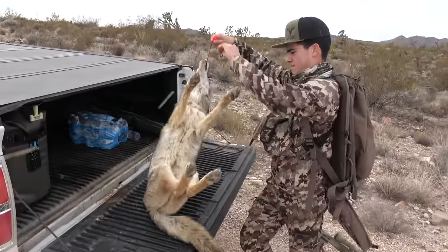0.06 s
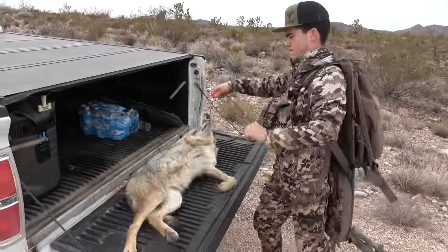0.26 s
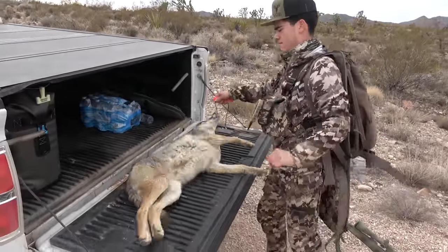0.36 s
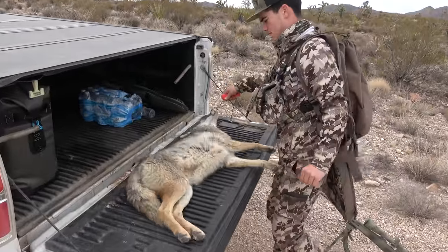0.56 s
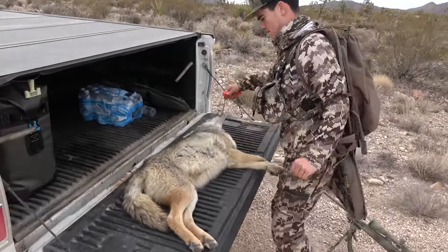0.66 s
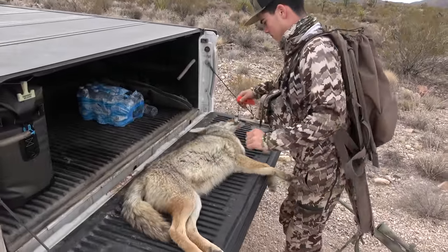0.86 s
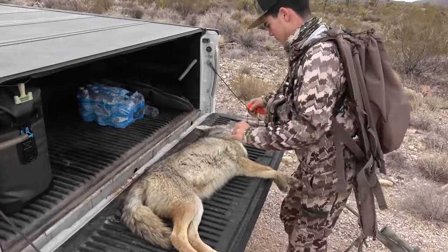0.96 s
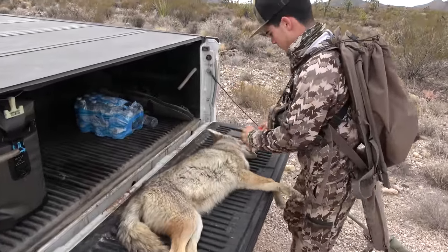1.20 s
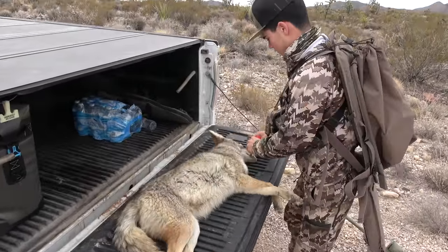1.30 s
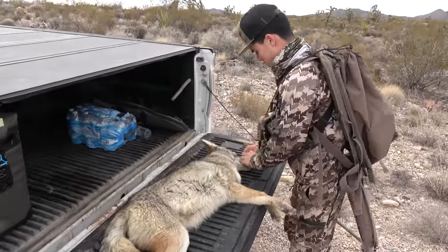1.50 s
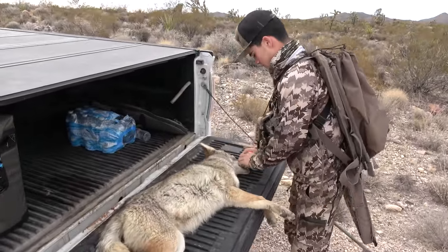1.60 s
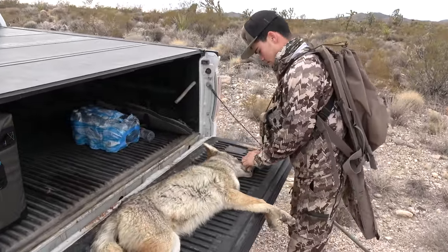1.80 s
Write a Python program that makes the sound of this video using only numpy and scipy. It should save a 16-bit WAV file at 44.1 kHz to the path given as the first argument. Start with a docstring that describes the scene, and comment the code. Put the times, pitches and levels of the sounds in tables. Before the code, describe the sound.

A heavy carcass thumps onto a truck tailgate, followed by knocks, small clicks and scuffs.

```python
"""A heavy carcass drops on the ribbed plastic tailgate of a truck in open scrubland.
Its soft weight slumps and forces the panel to boom and drum while the truck body rumbles; legs and head
knock on the panel with sharp attacks and leave it ringing. Strap, buckle and claws click as the strap is
worked loose, and cloth and fur scuff by friction. A faint open-air hiss and light wind lie below."""
import sys
import numpy as np
from scipy import signal
from scipy.fft import rfft, irfft, next_fast_len
from scipy.io import wavfile
from scipy.ndimage import uniform_filter1d, minimum_filter1d

SR = 44100
rng = np.random.default_rng(int(sys.argv[2]) if len(sys.argv) > 2 else 0)


def unload_wav(signal):
    """Save mono or channel-first audio to the path in sys.argv[1] as 16-bit WAV at rate SR, clipped to [-1, 1]."""
    wavfile.write(
        sys.argv[1],
        SR,
        np.round(np.clip(np.atleast_2d(signal).T, -1, 1) * 32767).astype(np.int16),
    )


N = 81585

# Weight rolling onto the panel: (time [s], boom [dB], drumming [dB], truck rumble [dB])
SLUMP_LEVELS = [(0.222, -75, -85, -53), (0.24, -21.5, -20, -28.5), (0.264, -37, -10, -17.5),
                (0.286, -8.5, -22, -35), (0.31, -19.5, -20, -26), (0.332, -9.5, -13.5, -33),
                (0.37, -12.5, -18.5, -34), (0.42, -19, -19.5, -33.5), (0.474, -27, -38.5, -34),
                (0.62, -44, -49.5, -43), (0.666, -43.5, -43, -60), (0.704, -42.5, -67, -51),
                (0.732, -49, -58, -56), (0.754, -54, -51, -61), (0.86, -64, -52.5, -61)]
# Spectra of the boom, drumming and knocks: (frequency [Hz], relative density [dB])
BOOM_SPECTRUM = [(65, -43), (110, -17), (189, -4), (221, -22), (252, -1.5), (324, -3.5), (384, -15),
                 (442, -53), (600, -2.5), (780, -31), (1320, -120)]
DRUM_SPECTRUM = [(210, -6), (350, -37), (404, -19.5), (824, -8), (906, -31), (1040, -11), (6000, -43.5),
                 (7800, -60), (13200, -120)]
PANEL_SPECTRUM = [(59, -52), (100, -25.5), (620, -5), (867, -7.5), (1460, -2.5), (2800, -8.5), (3760, -11),
                  (4940, -34), (6760, -38.5), (15000, -84)]
# Hard impacts, in relative levels: (time [s], crack [dB], bass [dB], middle [dB], treble [dB], top [dB],
# favoured frequency [Hz], decay time factor [1])
IMPACTS = [(0.241, -7, -15, -15.5, -18.5, -23, 774, 3.3), (0.261, -9, -14, -10, -23, -27, 573, 1.1),
           (0.311, -9.5, -29, -12, -23, -21, 770, 0.54), (0.329, -5, -16, -22.5, -22, -26.5, 255, 3.3),
           (0.376, -13, -10.5, -32, -18.5, -18, 576, 0.6), (0.413, -6, -11.5, -16, -38, -46, 347, 0.81),
           (0.491, -36, -43, -53, -33, -39.5, 318, 1.4), (0.556, -47, -32.5, -40, -30, -39.5, 270, 1.14),
           (0.602, -28, -46, -45, -40.5, -39, 355, 1.2), (0.878, -22.5, -42.5, -39, -54, -43, 288, 0.59),
           (0.888, -21.5, -45.5, -31.5, -41, -43.5, 786, 1.4),
           (1.047, 3.5, -17.5, -11.5, -17, -41, 704, 1.34), (1.072, 2.5, -19, -13, -19, -30.5, 590, 1.1),
           (1.143, -9, -22.5, -18.5, -11.5, -25, 590, 1.16), (1.252, -33, -30.5, -37, -32.5, -62, 750, 1.9),
           (1.26, -13, -24, -19, -21, -45, 590, 1), (1.287, -14, -41.5, -34.5, -70, -52, 350, 2.8),
           (1.473, -16.5, -38.5, -29.5, -31.5, -44, 1030, 1.4), (1.5, -27, -38, -44, -40.5, -41, 313, 3.3),
           (1.54, -5, -18.5, -13, -26, -42, 426, 0.88), (1.626, -35.5, -37.5, -49.5, -25.5, -45, 266, 0.38)]
# Damping of the panel: (frequency [Hz], time to fall 60 dB [s])
PANEL_DECAY = [(120, 0.39), (300, 0.22), (700, 0.21), (1800, 0.11), (4500, 0.12), (7000, .11),
               (12000, 0.031)]
# Normal modes of the panel: (frequency [Hz], relative level [dB], time to fall 60 dB [s])
PANEL_MODES = [(188.4, -1, 0.18), (257, -6, .18), (303, -2, 0.19), (437, -9, 0.16), (576.6, -1.5, 0.13),
               (654.5, -5, 0.15), (770.4, -4, 0.11), (1015, -7, .12), (1371, -9, .1), (1524, -9, 0.12),
               (1760, -8, 0.082), (2170, -19, .08)]
# Small clicks of strap, buckle and claws, and the sharp attacks of knocks on the panel:
# (time [s], tock level [dB], pitch [Hz], snap level [dB])
CLICKS_AND_ATTACKS = [(.023, -15, 860, -22), (0.054, -16, 890, -18.5), (.070, -18, 1250, -20),
                      (.078, -17, 880, -40), (.093, -17, 1110, -33), (.101, -20, 1000, -32),
                      (0.126, -17, 1000, -25), (.150, -21.5, 1450, -31), (0.3103, -29, 1400, -3),
                      (.3765, -21, 3700, -13), (.379, -12, 6200, -3), (.381, -22, 3700, -16),
                      (.492, -34, 4200, -29), (.521, -40, 4500, -36), (0.556, -17.5, 1040, -21),
                      (.722, -30, 3300, -46), (.796, -28.5, 1480, -58), (.836, -29.5, 2510, -38),
                      (0.916, -37, 1480, -24), (.929, -7.5, 880, -13), (0.967, -13, 1230, -14),
                      (0.987, -18, 1500, -34), (.995, -19, 1100, -14), (1.02, -36, 1370, -24),
                      (1.035, -14, 1420, -24), (1.0465, -6, 1450, -34), (1.0728, -6, 3600, -27),
                      (1.289, -35, 900, -31), (1.399, -33, 1440, -45), (1.477, -10.5, 1920, -22),
                      (1.503, -15, 3200, -25), (1.5387, -9.5, 990, -32), (1.565, -15, 3500, -21),
                      (1.599, -18, 1600, -39), (1.607, -11.5, 1320, -32), (1.628, -31, 4200, -36),
                      (1.665, -13, 980, -32), (1.709, -8.5, 1450, -28), (1.715, -11, 1550, -40),
                      (1.742, -22, 1190, -43), (1.760, -19.5, 990, -32.5), (1.792, -11.5, 1050, -20.5),
                      (1.805, -15.5, 1110, -41), (1.836, -28, 1010, -49)]
# Rubbing of cloth and fur: (time [s], level [dB])
SCUFF_LEVELS = [(0, -34.5), (.05, -32.5), (.11, -33), (.145, -35.5), (.165, -49), (.22, -47), (.6, -50.5),
                (.75, -45), (.86, -54.5), (.93, -49.5), (.98, -33), (1.03, -45), (1.2, -51), (1.44, -56.5),
                (1.49, -43), (1.53, -49), (1.62, -38), (1.69, -46.5), (1.73, -37), (1.78, -41.5),
                (1.82, -41), (1.85, -40)]
# Spectra of the rubbing and the open air: (frequency [Hz], relative density [dB])
SCUFF_SPECTRUM = [(120, -8.5), (350, 1.5), (550, -5), (1000, -1), (2000, -6), (3300, -8.5), (4300, -11.5),
                  (5200, -18), (8000, -20.5), (12000, -26), (15000, -46)]
AIR_SPECTRUM = [(25, 10), (60, 6.5), (250, 11), (650, -4), (1500, -11), (4000, -10.5), (5200, -15.5),
                (8000, -13.5), (14000, -20.5), (16000, -40)]
# Stereo balance: (frequency [Hz], left minus right [dB])
BALANCE = [(60, 2), (180, 3.5), (550, -4), (1650, -1), (4970, 0), (15000, 1)]
# Stereo width: (frequency [Hz], side relative to middle [dB])
SIDE_LEVELS = [(60, -20), (180, -30), (550, -28), (1650, -37), (5000, -23.5), (15000, -11)]

BAND_EDGES_HZ = 28 * 2 ** np.arange(0, 9.4, 1 / 3)
KNOCK_HZ = (350, 1300, 3500, 8000)   # bass, middle, treble, top
KNOCK_GAIN_DB, CRACK_GAIN_DB, CRACK_T60_S = -4, -9, 0.0063
MODE_GAIN_DB, MODE_LOSS_DB_PER_OCTAVE, MODE_JITTER_S = 4.5, 11, 0.002025
TOCK_T60_CYCLES, SNAP_HZ = 4.87, (2050, 8330)
GRAINS_PER_S, GRAIN_SPREAD_DB = 3000, 3.5
HISS_DB, WIND_DB, AIR_WIDTH = -51, -67.5, 0.14
LIMIT_DB, RELEASE_DB_PER_S = -2.5, 150


def slump():
    """Forced vibration: the soft weight drives a boom and hollow drumming over the truck's rumble."""
    silence = (SLUMP_LEVELS[-1][0] + .05, -90, -90, -90)
    boom_db, drum_db, rumble_db = in_time(SLUMP_LEVELS + [silence])
    boom = coloured(rng.standard_normal((2, N)), BOOM_SPECTRUM + [(1100, -51)])
    drum = coloured(rng.standard_normal((2, N)), [(200, -50)] + DRUM_SPECTRUM + [(9000, -74)])
    rumble = unit_rms(band(rng.standard_normal(N), 43, 124))
    return amp(boom_db) * boom + amp(drum_db) * drum + amp(rumble_db) * rumble


def knocks():
    """Free vibration: each impact cracks and excites the panel's modes; the treble is damped sooner."""
    times, crack, bass, middle, treble, top, favoured_hz, decay_factor = np.transpose(IMPACTS)
    white, panel = rng.standard_normal((2, N)), 0
    bandwidth_db = 10 * np.log10(np.array(KNOCK_HZ) * 3 / SR)
    tilts = np.transpose([bass, middle, treble, top]) - at_hz(PANEL_SPECTRUM, KNOCK_HZ) - bandwidth_db
    # Densely overlapping modes act as bands of decaying noise.
    for k, (low, high) in enumerate(zip(BAND_EDGES_HZ[5:], BAND_EDGES_HZ[6:])):
        hz = np.sqrt(low * high)
        tilt_db = np.array([np.interp(np.log(hz), np.log(KNOCK_HZ), row) for row in tilts])
        db = KNOCK_GAIN_DB + at_hz(PANEL_SPECTRUM, hz) + tilt_db
        ringing = decays(times, amp(db), at_hz(PANEL_DECAY, hz) * decay_factor)
        cracks = decays(times, amp(db - middle + crack + CRACK_GAIN_DB), CRACK_T60_S)
        panel = panel + band(white[k % 2] * (ringing + cracks), low, high)
    # Distinct modes are excited less the farther they lie from an impact's favoured frequency.
    for hz, mode_db, t60 in PANEL_MODES:
        loss_db = MODE_LOSS_DB_PER_OCTAVE * np.abs(np.log2(hz / favoured_hz))
        db = bass + MODE_GAIN_DB + mode_db - loss_db + rng.normal(0, 1.1, len(times))
        onsets = times + MODE_JITTER_S * rng.random(len(times))
        force = impulses(onsets, amp(db) * rng.choice([-1, 1], len(times)))
        panel = panel + ring(force, hz, t60)
    return signal.sosfilt(signal.butter(4, 126.5, "high", fs=SR, output="sos"), panel)


def clicks_and_attacks():
    """Impulse excitation: each small click or knock attack is a pitched tock, a snap and a faint wash."""
    times, tock_db, pitches, snap_db = np.transpose(CLICKS_AND_ATTACKS)
    tocks = sum(ring(impulses([time], amp(db)), hz, TOCK_T60_CYCLES / hz)
                for time, db, hz in zip(times, tock_db, pitches))
    fizz = rng.standard_normal(N) * decays(times, amp(snap_db - 12), t60=0.018)
    snaps = band(2 * impulses(times, amp(snap_db)) + fizz, *SNAP_HZ)
    wash = rng.standard_normal(N) * decays(times, amp(tock_db - 13.5), t60=0.072)
    return band(tocks, 510, 8300) + snaps + band(wash, 660, 2880)


def scuff():
    """Friction noise: cloth and fur rub in dense, uneven grains that come in clumps."""
    sizes = amp(GRAIN_SPREAD_DB * np.minimum(rng.exponential(1, N), 5))
    signs = rng.choice([-1, 1], N)
    slips = rng.random(N) < GRAINS_PER_S * amp(4 * drift(40)) / SR
    grains = sizes * signs * slips
    level_db, = in_time(SCUFF_LEVELS)
    return amp(level_db) * coloured([grains, -grains], SCUFF_SPECTRUM)


def air():
    """Ambient noise: the broadband hiss of open land over low, fluctuating wind."""
    hiss = amp(HISS_DB) * coloured(rng.standard_normal((2, N)), AIR_SPECTRUM)
    gusts = amp(WIND_DB + 5.5 * drift(4))
    return hiss + gusts * unit_rms(band(rng.standard_normal(N), 30, 69))


def stereo(x):
    """Level difference and decorrelation: two close microphones differ by pitch and by a weak smear."""
    size = next_fast_len(N + 8192)
    hz = np.maximum(np.arange(size // 2 + 1) * SR / size, 20)
    smear = rng.standard_normal(4000) * np.exp(-np.arange(4000) / SR / .03)
    lean = amp(at_hz(BALANCE, hz) / 2)
    side = amp(at_hz(SIDE_LEVELS, hz)) * rfft(smear / np.linalg.norm(smear), size)
    return np.array([irfft(rfft(x, size) * gain, size)[:N] for gain in (lean + side, 1 / lean - side)])


def amp(db):
    return 10 ** (np.asarray(db) / 20)


def unit_rms(x):
    return x / np.sqrt(np.mean(x ** 2) + 1e-20)


def in_time(rows):
    times, *columns = np.transpose(rows)
    return [np.interp(np.arange(N) / SR, times, db, left=-120) for db in columns]


def at_hz(points, hz):
    frequencies, values = np.transpose(points)
    return np.interp(np.log(hz), np.log(frequencies), values)


def drift(hz):
    """Random modulation: low-passed noise of rms 1."""
    pole = np.exp(-80 * np.pi * hz / SR)
    white = rng.standard_normal(N // 40 + 2002)
    slow = signal.lfilter([1], [1, -2 * pole, pole * pole], white)[2000:]
    return np.interp(np.arange(N) / 40, np.arange(len(slow)), unit_rms(slow))


def band(x, low, high):
    return signal.sosfilt(signal.butter(2, [low, high], "band", fs=SR, output="sos"), x + 1e-18)


def impulses(times, height):
    out = np.zeros(N)
    np.add.at(out, np.minimum((np.asarray(times) * SR).astype(int), N - 1), height)
    return out


def decays(times, height, t60):
    """Exponential decay: an envelope of sudden starts, each falling 60 dB in t60 seconds; powers add."""
    age = np.arange(N) / SR - np.asarray(times)[:, None]
    fall = -np.log(1000) * 2 * np.maximum(age, 0) / np.reshape(t60, (-1, 1))
    power = (age >= 0) * np.reshape(height, (-1, 1)) ** 2 * np.exp(fall)
    return np.sqrt(power.sum(axis=0))


def ring(force, hz, t60):
    """Damped oscillator: a unit impulse starts a decaying sine of height 1."""
    r, w = amp(-60 / (t60 * SR)), 2 * np.pi * hz / SR
    return signal.lfilter([0, np.sin(w)], [1, -2 * r * np.cos(w), r * r], force + 1e-18)


def coloured(pair, spectrum):
    """Spectral shaping: two signals feed alternate third-octave bands, each flickering; rms 1."""
    run_in = [np.concatenate([x[-8000:], x]) for x in pair]
    out = 0
    for k, (low, high) in enumerate(zip(BAND_EDGES_HZ, BAND_EDGES_HZ[1:])):
        db = at_hz(spectrum, np.sqrt(low * high)) + 2 * drift(19.5)
        out = out + amp(db) * band(run_in[k % 2], low, high)[-N:]
    return unit_rms(out)


def scene():
    """Superposition: tailgate, contact noises and open air add in two channels."""
    contacts = stereo(clicks_and_attacks() + scuff()) * amp([[-1], [1]])   # slightly to the right
    tailgate = stereo(slump() + knocks())
    background = air() + AIR_WIDTH * air() * [[1], [-1]]
    return tailgate + contacts + background


def record(dry):
    """Band and peak limiting: deep bass is cut, a quick limiter holds the peaks, the top is cut."""
    dry = signal.sosfilt(signal.butter(2, 38.5, "high", fs=SR, output="sos"), dry)
    release = RELEASE_DB_PER_S * np.arange(N) / SR
    over_db = np.maximum(20 * np.log10(np.abs(dry).max(axis=0) + 1e-9) - LIMIT_DB, 0)
    held_db = np.maximum.accumulate(over_db + release) - release
    gain_db = uniform_filter1d(minimum_filter1d(-held_db, size=177), size=88)
    return signal.sosfilt(signal.cheby2(12, 70, 16500, fs=SR, output="sos"), dry * amp(gain_db))


dry = scene()
out = record(dry)
unload_wav(out)
```